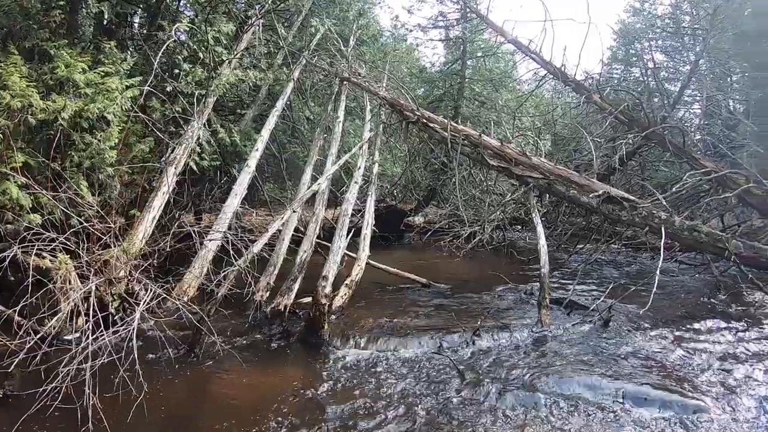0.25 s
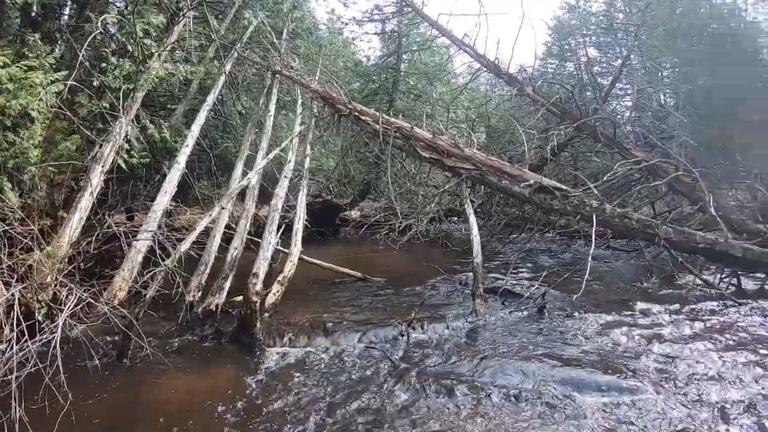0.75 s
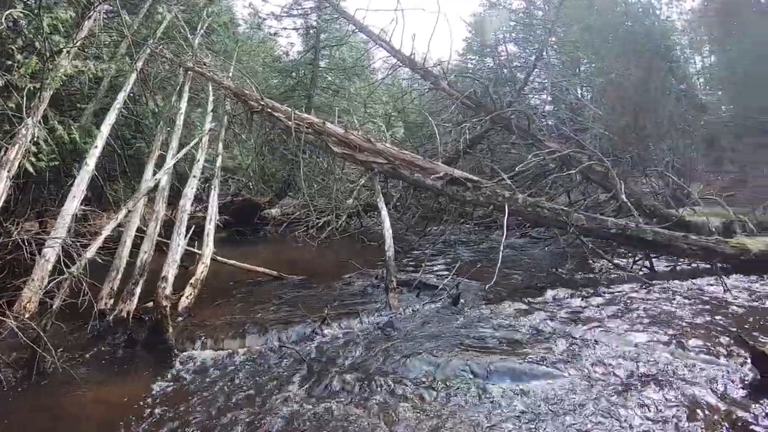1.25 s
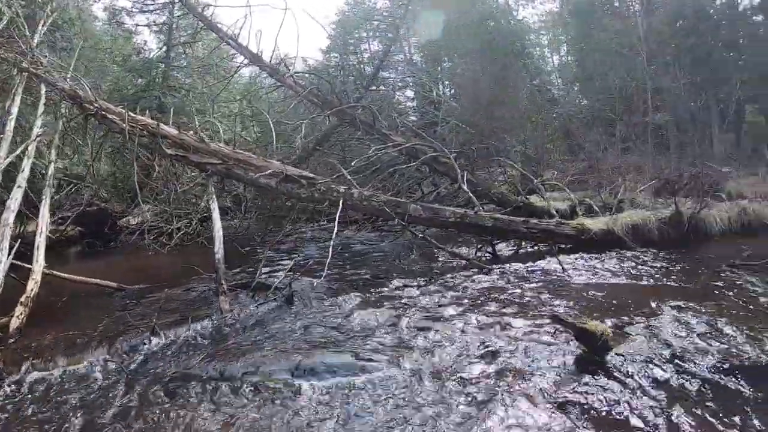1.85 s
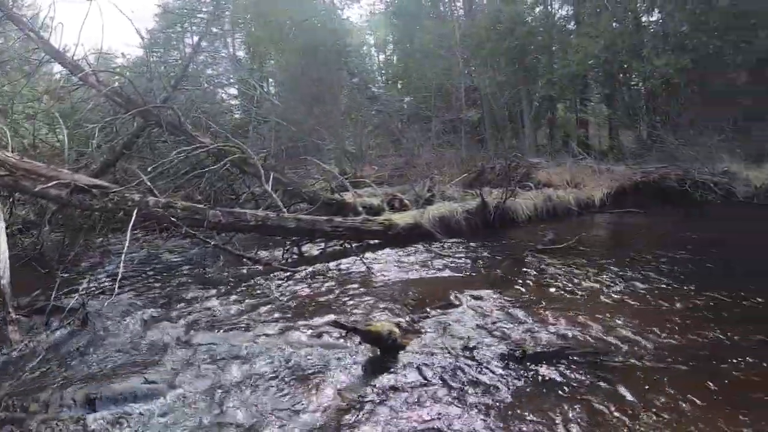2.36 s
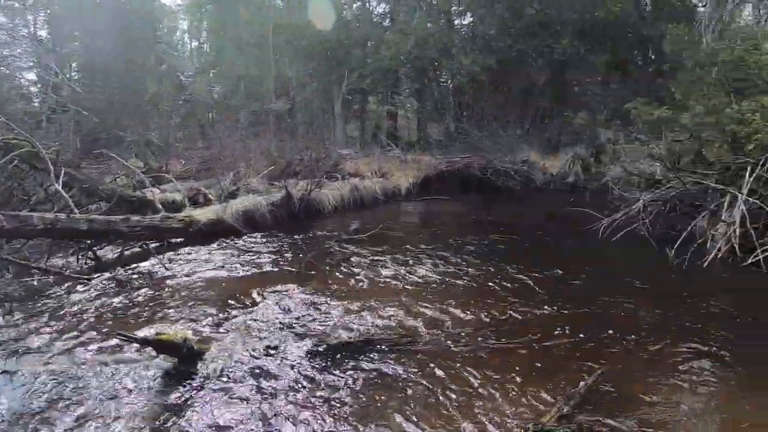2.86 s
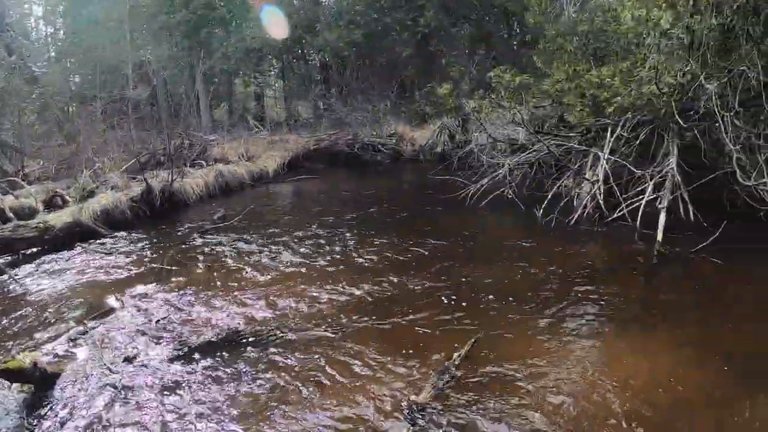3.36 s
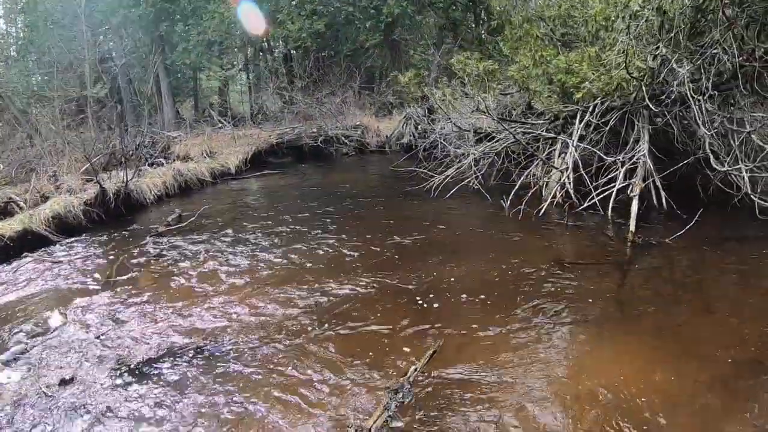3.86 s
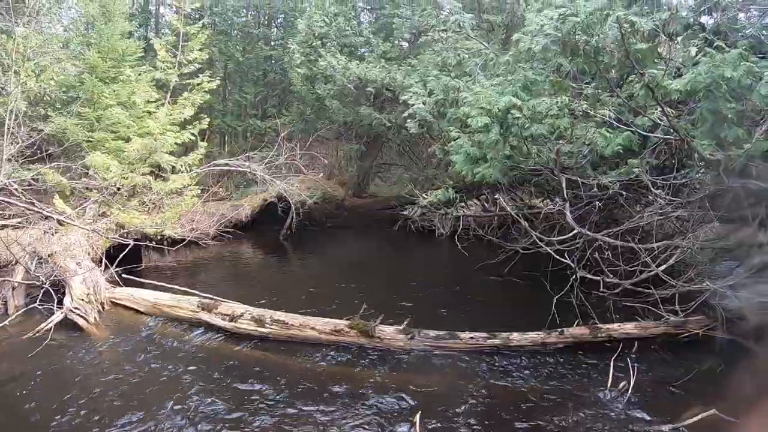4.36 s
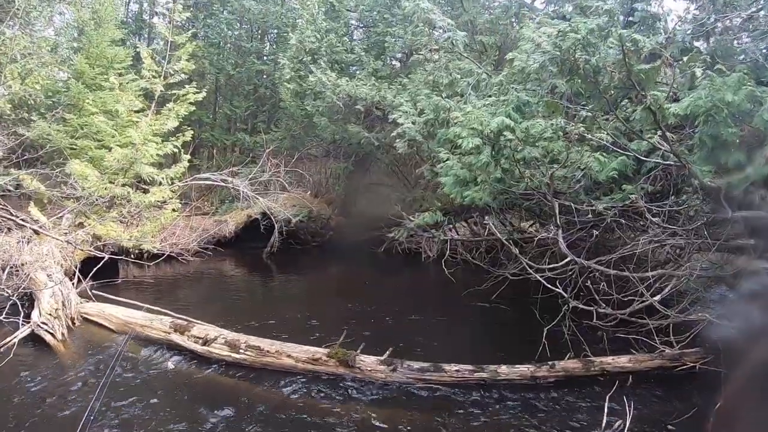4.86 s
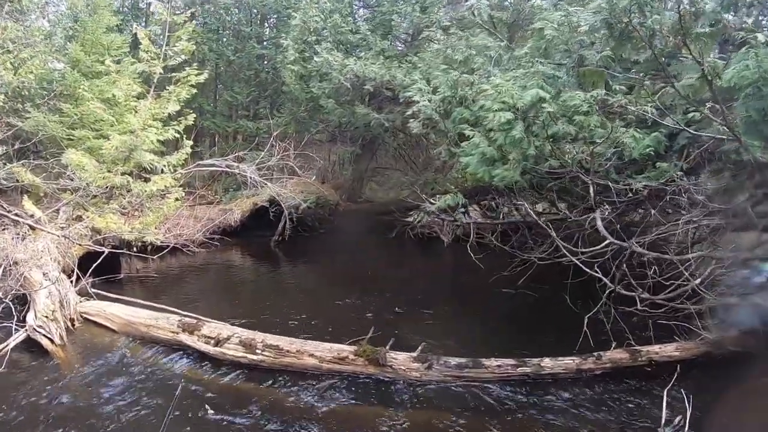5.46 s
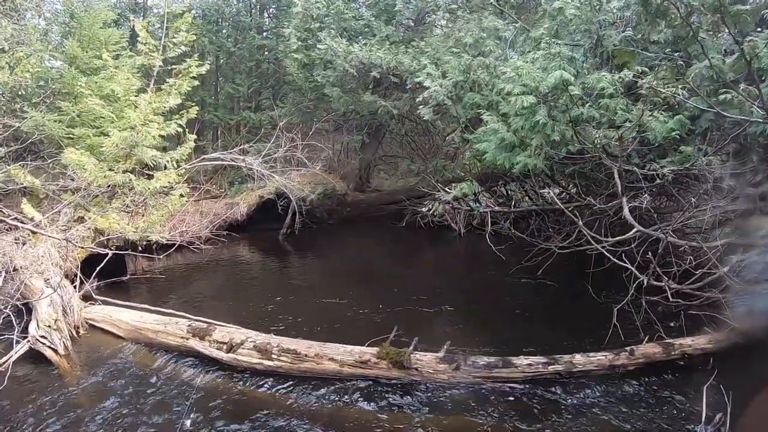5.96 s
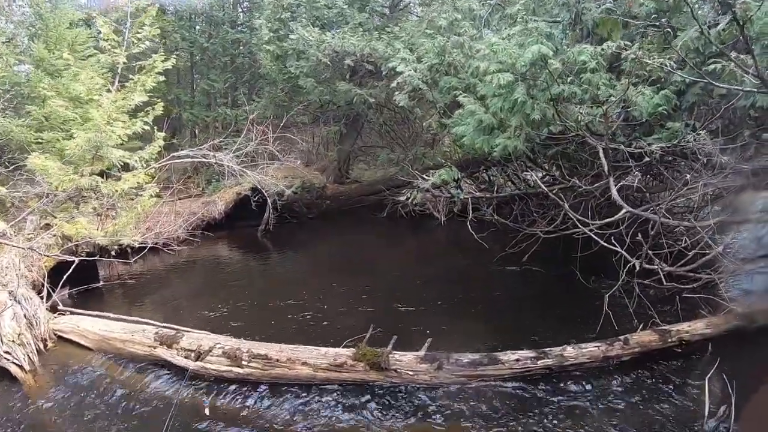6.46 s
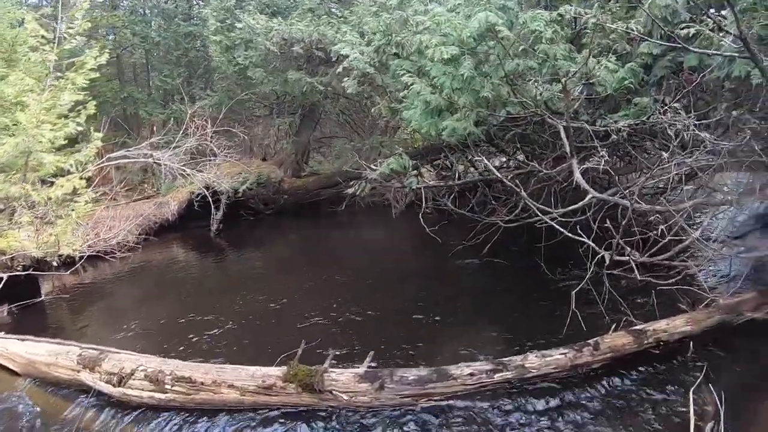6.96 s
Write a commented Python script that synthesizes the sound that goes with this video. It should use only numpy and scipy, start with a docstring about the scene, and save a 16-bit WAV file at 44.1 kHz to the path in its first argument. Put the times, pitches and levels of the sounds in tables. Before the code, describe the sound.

A small creek babbles over a shallow riffle, cuts to near-silence for a moment, then returns fuller and deeper, gulping around a log.

```python
"""A small forest creek in stereo: a shallow riffle, a brief near-silence, then a deeper pool behind a log.
The rush is a swarm of tiny bubble rings over hiss, coloured in time and frequency; larger air pockets
gulp, mostly with rising pitch, and droplets tick or ping. Side water, a separate swarm, widens the image
late in each view. Faint lumpy low noise is the air on the microphone."""
import sys
import numpy as np
from scipy import signal
from scipy.fft import rfft, irfft, next_fast_len
from scipy.io import wavfile
from scipy.ndimage import uniform_filter1d

SR = 44100
rng = np.random.default_rng(int(sys.argv[2]) if len(sys.argv) > 2 else 0)


def persist_wave(psi):
    """Save psi, clipped to +-1, as 16-bit WAV."""
    counts = np.round(np.clip(psi, -1, 1) * 32767).astype(np.int16)
    wavfile.write(sys.argv[1], SR, np.atleast_2d(counts).T)


N = 318137
SECOND_VIEW_S = 4.32  # the flow colour changes here from riffle to pool


def gain_of(db):
    """Amplitude factor of a level in dB."""
    return 10 ** (np.asarray(db) / 20)


def evened(x):
    """Scales a signal to rms 1."""
    return x / np.sqrt(np.mean(x ** 2) + 1e-20)


def read(points, hz):
    """Interpolates a spectrum table on a log-frequency axis."""
    table_hz, value = np.transpose(points)
    return np.interp(np.log(hz + 1), np.log(table_hz + 1), value)


def follow(rows, t):
    """Interpolates every column of a time curve at the times t."""
    time_s, *columns = np.transpose(rows)
    return np.array([np.interp(t, time_s, column) for column in columns])


def unit(db):
    """Shifts a spectrum so that its powers sum to 1."""
    return db - 10 * np.log10(np.sum(gain_of(db) ** 2))


def chance(smooth_s):
    """A slow random wander of rms 1: noise averaged twice."""
    size = max(round(smooth_s * SR), 1)
    smooth = uniform_filter1d(rng.standard_normal(N), size)
    return evened(uniform_filter1d(smooth, size))


def spurts(decay_s):
    """Splashes of uneven size that start at once and die away exponentially; rms 1."""
    per_s = 60
    kicks = rng.exponential(1, N) * (rng.random(N) < per_s / SR)
    out = signal.lfilter([1], [1, -np.exp(-1 / (decay_s * SR))], kicks)
    return evened(out - out.mean())


def patches(t, hz):
    """Random patches a few hundred Hz wide and some 40 ms long; rms 1."""
    noise = rng.standard_normal((len(t), len(hz))).T
    tall = uniform_filter1d(noise, size=12, axis=0)
    return evened(uniform_filter1d(tall, size=7, axis=1))


def bubble(length_s, hz, rise, attack):
    """Trapped air rings a few cycles, swelling faster than it dies; the pitch glides by the factor rise."""
    u = np.linspace(0, 1, max(round(length_s * SR), 4))
    warped = u ** np.clip(attack, .3, .8)  # smaller attack = sharper start
    swell = np.minimum(1.62 * np.sin(np.pi * warped) ** 2, 1)
    return swell * np.sin(2 * np.pi * np.cumsum(hz * rise ** u) / SR)


def placed(rows):
    """Lays out bubbles (time s, length s, start Hz, rise, attack, level dB) in time."""
    out = np.zeros(N)
    for time_s, length_s, hz, rise, attack, db in rows:
        sound = gain_of(db) * bubble(length_s, hz, rise, attack)
        out[round(time_s * SR):][:len(sound)] += sound
    return out


def swarm(per_s_at_1khz, spread_db_at_1khz, clump, hiss_db, count=56):
    """Bubble rings of many sizes in clumps, about equally strong at all pitches, over white hiss."""
    size = next_fast_len(N + SR // 4)
    splashes, lapping = spurts(decay_s=.004), chance(smooth_s=.05)
    total = np.zeros(size // 2 + 1, complex)
    for hz in np.geomspace(140, 15000, count):
        cycles, rise = rng.uniform(11.0, 24.5), rng.uniform(1.0, 1.4)
        # the smallest come in the strongest bursts
        busy = np.exp(clump * (hz / 4000) ** .6 * splashes + .2 * lapping)
        # small bubbles are more numerous
        per_s = per_s_at_1khz * (hz / 1000) ** .8
        # four times too many candidates, thinned to follow busy
        at = rng.integers(0, N, 4 * round(per_s * N / SR))
        keep = rng.random(len(at)) < busy[at] / busy.mean() / 4
        big = np.minimum(rng.exponential(1, len(at)), 3.2)
        spread_db = spread_db_at_1khz * (hz / 1000) ** -.22
        train = np.bincount(at, keep * gain_of(spread_db * big), N)
        grain = bubble(cycles / hz, hz / np.sqrt(rise), rise, attack=0.42)
        train_spectrum = rfft(train - train.mean(), size) / train.std()
        grain_spectrum = rfft(grain / np.linalg.norm(grain), size)
        # sqrt(hz) makes up for the log spacing of the pitches
        total += train_spectrum * grain_spectrum * np.sqrt(hz)
    return evened(irfft(total, size)[:N]) + gain_of(hiss_db) * rng.standard_normal(N)


def coloured(x, field_db):
    """Flattens a sound's spectrum and gives it the level field_db(frames, hz), dB of power per bin."""
    frame, hop = 1024, 256
    hz, t, z = signal.stft(evened(x), SR, nperseg=frame, noverlap=frame - hop)
    power = abs(z) ** 2
    smooth_power = uniform_filter1d(np.mean(power, 1), 9)
    z = z / np.sqrt(smooth_power)[:, None] * np.sqrt(np.mean(power))
    z = z * gain_of(field_db(t, hz)) * np.sqrt(len(hz))
    return signal.istft(z, SR, nperseg=frame, noverlap=frame - hop)[1][:N]


def flow(t):
    """Rush and spray levels in dB through both views."""
    # flow in each view: (time [s], rush level [dB], high spray level [dB])
    view_levels = [
        [(.2, -50, -81), (.45, -47.5, -72.5), (.75, -48.5, -68.5), (1.1, -44.5, -65), (1.5, -45.5, -67),
         (2.0, -44.5, -62.5), (2.8, -45.5, -63), (3.4, -45.5, -65.5), (3.85, -49, -67.5), (4.05, -50, -68),
         (4.22, -46, -60.5)],
        [(4.47, -49.5, -87), (4.58, -43.5, -73.5), (4.7, -44.5, -70.5), (4.85, -39, -65), (5.3, -41.5, -64.5),
         (5.6, -46, -69.5), (5.82, -44, -75), (6.0, -41.5, -66.5), (6.15, -37, -59.5), (6.4, -37.5, -64),
         (6.7, -45.5, -73), (6.9, -42.5, -71.5), (7.2, -49, -74.5)],
    ]
    return follow(np.concatenate(view_levels), t)


def stream_field(t, hz):
    """Each view's water colour, churning in patches, lifted by the rush below and the spray above."""
    # bands that set the levels, rush then spray: (low edge [Hz], high edge [Hz])
    flow_bands = [(400, 1400), (5000, 15000)]
    # relative colour of the water in each view: (frequency [Hz], level per Hz [dB])
    riffle_colour = [(100, -20.5), (140, -6.5), (290, -11.5), (664, -1.5), (1220, -6), (1800, -10.5),
                     (3500, -17), (5500, -28), (6500, -35.5), (10600, -41), (13000, -54), (15500, -59.5)]
    pool_colour = [(100, -13.5), (170, -8.5), (406, -4.5), (825, -8), (1920, -7.5), (3600, -14.5),
                   (4500, -21), (5600, -24.5), (7070, -31.5), (10600, -33), (11600, -45), (13800, -43),
                   (15500, -62)]
    # how far each pitch follows spray rather than rush: (frequency [Hz], share [0 = rush, 1 = spray])
    riffle_share = [(240, 0.29), (750, 0), (2600, 0.21), (8700, 0.9), (14000, 0.9)]
    pool_share = [(240, -0.046), (750, 0.13), (2600, 0.38), (8700, 0.99), (14000, 1.46)]
    patchy_db = 1.2  # rms
    first = t < SECOND_VIEW_S
    colour = np.where(first, read(riffle_colour, hz)[:, None], read(pool_colour, hz)[:, None])
    share = np.where(first, read(riffle_share, hz)[:, None], read(pool_share, hz)[:, None])
    band_power = [np.sum(gain_of(colour[(hz >= low) & (hz < high)]) ** 2, 0) for low, high in flow_bands]
    rush, spray = flow(t) - 10 * np.log10(band_power)
    return patchy_db * patches(t, hz) + colour + rush + share * (spray - rush)


def stream():
    """The rush of the creek: a dense bubble swarm with the colour and level of the flow."""
    return coloured(swarm(per_s_at_1khz=60, spread_db_at_1khz=3.7, clump=.28, hiss_db=-1.5), stream_field)


def gulps():
    """Air pockets that stand out of the rush; those with more rise swell more slowly; strength wobbles."""
    # air pockets: (time [s], length [ms], start pitch [Hz], pitch rise [factor], level [dB])
    pockets = [(0.225, 9.8, 1090, 1.4, -44), (0.44, 16, 540, 1.4, -48), (0.476, 16, 546, 1.1, -42.5),
               (0.508, 9.1, 1185, 0.96, -38), (0.5653, 10, 1520, 1.3, -37.5), (0.752, 20, 640, 1.03, -42),
               (0.8093, 46, 438, 1.01, -40), (0.9159, 36, 382, 1.83, -37.5), (1.0246, 7, 695, 0.83, -31),
               (1.038, 23, 580, 1.3, -37.5), (1.044, 20, 1150, 1.3, -43), (1.0676, 51, 390, 1, -45),
               (1.214, 26, 780, 1.1, -46), (1.245, 24, 640, 0.8, -42), (1.306, 26, 620, 1.3, -37.5),
               (1.336, 39, 738, 1.48, -35.5), (1.38, 30, 1153, 1.07, -43), (1.4379, 62, 494, 1.4, -40.5),
               (1.516, 35, 298, 1.6, -41), (1.609, 18, 570, 0.97, -41.5), (1.907, 16, 650, 1.02, -40),
               (1.949, 15, 670, 1.17, -37), (1.965, 22, 1264, 1.07, -36), (1.969, 7.2, 860, 1.2, -33),
               (2.045, 27, 668, 1.2, -36.5), (2.293, 5, 1442, 1.06, -32), (2.3608, 16.5, 368, 1.5, -38),
               (2.3796, 15, 462, 3, -37.5), (2.4488, 6.5, 1800, 1.4, -36), (2.5703, 6.5, 1520, 0.85, -37),
               (2.578, 13, 1070, 1.16, -39.5), (2.61, 15, 1340, 0.93, -43), (2.672, 22, 553, 1.1, -45),
               (2.985, 7.2, 840, 1.14, -31.5), (3.063, 33, 400, 1.2, -43.5), (3.072, 13, 920, 1.1, -39.5),
               (3.098, 18, 400, 1, -37.5), (3.1486, 25, 514, 1.4, -35.5), (3.176, 26, 460, 0.95, -41.5),
               (3.185, 15, 915, 1, -41), (3.385, 33, 323, 1.9, -37), (3.41, 100, 303, 1.29, -44),
               (3.418, 30, 470, 1.6, -33.5), (3.458, 10.3, 950, 1.4, -38), (3.477, 36, 690, 0.84, -34.5),
               (3.676, 49, 344, .97, -44), (3.715, 60, 254, 2.4, -45.5), (3.909, 17, 648, 1.02, -33.5),
               (4.2211, 24, 430, 1, -43.5), (4.5459, 26.5, 333, 1.78, -32), (4.595, 6, 1210, 1.44, -34.5),
               (4.758, 62, 206, 1.35, -29), (4.7697, 11.85, 1780, 1.03, -33), (4.7873, 26, 543, 0.98, -35),
               (4.789, 35, 240, 1.92, -31), (4.814, 70, 146, 2.97, -25), (4.836, 18, 613, 1.1, -34),
               (4.913, 65, 180, 1.94, -35.5), (4.971, 16, 390, 1.1, -26), (4.985, 15, 390, 1.1, -32.5),
               (5.005, 16, 440, 1.26, -37), (5.146, 36, 563, 1.4, -32), (5.25, 12, 1840, 0.95, -34),
               (5.256, 22, 705, 2.3, -34), (5.2664, 14, 345, 1.8, -30), (5.341, 14, 1030, 1.1, -39),
               (5.398, 21, 338, 1.34, -34), (5.4151, 64, 376, 1.21, -37.5), (5.7651, 17, 400, 1.74, -36),
               (5.911, 6, 950, 1.18, -29), (5.935, 11, 545, 1.07, -34), (5.9906, 8.7, 547, 2.3, -30.5),
               (6.03, 22, 398, 1.27, -34.5), (6.1, 20, 360, 0.95, -33), (6.104, 9.9, 1560, 0.89, -32),
               (6.16, 11, 1890, 1, -32), (6.169, 16, 930, 1.07, -32.5), (6.214, 26, 225, 1.05, -33),
               (6.2535, 47, 200.7, 0.96, -30.5), (6.256, 22, 370, 0.9, -27.5), (6.278, 24, 398, 1.06, -29),
               (6.3018, 22, 418, 0.99, -27.5), (6.3573, 13.6, 710, 0.9, -23), (6.351, 12, 1290, 1.1, -35),
               (6.382, 16, 854, 1.08, -31.5), (6.435, 18, 377, 1.25, -31), (6.46, 15, 1980, 1.1, -38),
               (6.53, 13, 465, 1.26, -35), (6.7177, 41, 254, 2.2, -38), (6.7692, 12.8, 302, 1.72, -31),
               (6.898, 15, 355, 1.1, -37)]
    ring_attack, gulp_attack, gulp_rise = 0.38, 0.66, 1.5  # steady ring; climbing gulp; factor of full gulp
    ragged_db = 0.9  # rms
    wobble = gain_of(ragged_db * chance(smooth_s=.006))
    rows = []
    for time_s, length_ms, hz, rise, db in pockets:
        attack = np.interp(rise, [1, gulp_rise], [ring_attack, gulp_attack])
        rows.append((time_s, length_ms / 1000, hz, rise, attack, db))
    return wobble * placed(rows)


def droplets():
    """Droplets that tick or ping: short rings of a few cycles with a slight rise in pitch."""
    # droplets: (time [s], start pitch [Hz], length [cycles], level [dB])
    drops = [(0.5237, 3500, 10, -44), (0.9702, 3300, 6.5, -39.5), (1.659, 2220, 6, -37),
             (2.155, 3400, 6.1, -28), (2.192, 2135, 8.8, -34), (2.288, 7050, 8.7, -32.5),
             (2.8089, 4150, 7, -39), (3.0375, 9600, 9, -46), (3.1188, 5200, 8.8, -43),
             (3.362, 7000, 12, -46), (3.363, 1800, 24, -41), (3.3966, 9000, 12, -47), (3.41, 3290, 16, -37),
             (3.419, 6400, 10, -36), (3.501, 7000, 6.5, -41), (3.63, 4300, 16, -39.5),
             (3.648, 3650, 12, -34.5), (3.651, 6900, 9.2, -32.5), (3.7056, 6700, 5, -42),
             (3.78, 5100, 14, -45), (3.9, 1680, 21, -43.5), (4.1725, 6750, 15, -41), (4.235, 6700, 12, -39),
             (4.5303, 4220, 18, -44.5), (4.571, 3570, 8, -38.5), (5.2599, 3070, 6.5, -31),
             (5.3299, 8500, 9, -48), (5.51, 3180, 17, -40.5), (5.5846, 4700, 8.5, -37.5),
             (6.061, 3090, 30, -36.5), (6.147, 4330, 9, -48), (6.185, 2620, 7.7, -34),
             (6.234, 3600, 12, -36), (6.305, 4800, 5, -34), (6.459, 3400, 16, -40.5),
             (6.7817, 2430, 18, -38.5), (7.004, 3730, 10, -43), (7.084, 3020, 12, -38.5),
             (7.135, 7000, 7.3, -43.5), (7.1385, 2900, 6.7, -31)]
    rise, attack = 1.035, 0.49
    return placed([(time_s, cycles / hz, hz, rise, attack, db) for time_s, hz, cycles, db in drops])


def opened(t):
    """How far the stereo image has opened, 0-1, once in each view."""
    riffle_opens_s, pool_opens_s, opening_s = 2.925, 6.82, 0.42
    start_s = np.where(t < SECOND_VIEW_S, riffle_opens_s, pool_opens_s)
    return np.clip((t - start_s) / opening_s, 0, 1)


def side_field(t, hz):
    """Side water that opens late in each view plus a faint treble, present throughout; both follow the spray."""
    # relative colour of the side water: (frequency [Hz], level per Hz [dB])
    wide_colour = [(82, -55), (140, -22), (406, -20), (638, -6), (1780, -1.5), (2800, -7), (3150, -11.5),
                   (5000, -20), (5700, -12.5), (6790, -10), (8200, -18), (15500, -48)]
    # relative colour of the faint treble: (frequency [Hz], level per Hz [dB])
    treble_colour = [(4000, -31), (10500, -19), (12000, -11.5), (15700, -24)]
    wide_db, treble_db = 15, -22  # relative to the spray
    wide = gain_of(unit(read(wide_colour, hz))[:, None] + wide_db) * opened(t)
    treble = gain_of(unit(read(treble_colour, hz))[:, None] + treble_db)
    return 10 * np.log10(wide ** 2 + treble ** 2) + flow(t)[1]


def side_water():
    """Water that differs between the channels: a second, sparser and more clumped bubble swarm."""
    return coloured(swarm(per_s_at_1khz=42, spread_db_at_1khz=5.0, clump=0.37, hiss_db=-7.5), side_field)


def right_only(aside):
    """The part of the side water to take from the mid so that it lands on the right alone."""
    # lean of the side water to the right: (frequency [Hz], share [0-1])
    right_lean = [(2500, 0), (5000, 0.6), (6800, 0.68), (14000, 0.45)]
    return irfft(rfft(aside) * read(right_lean, np.fft.rfftfreq(N, 1 / SR)), N)


def rumble():
    """Lumpy low noise of air on the microphone as mid and a much weaker, independent side."""
    # relative colour of the rumble: (frequency [Hz], level [dB])
    rumble_colour = [(12, -20), (20, 0), (45, 0), (85, -2), (115, -10), (170, -30), (260, -120)]
    # strength of the moving air: (time [s], level [dB])
    gusts = [(0, -66), (1.7, -68), (2.2, -63), (3.2, -74), (4.3, -76), (4.5, -62), (5.5, -64), (7.2, -65)]
    lumps = rng.standard_normal((2, N)) * gain_of(4 * chance(smooth_s=0.042))
    shaped = irfft(rfft(lumps) * gain_of(read(rumble_colour, np.fft.rfftfreq(N, 1 / SR))), N)
    mid_side_db = [[0], [-25]]
    return evened(shaped) * gain_of(follow(gusts, np.arange(N) / SR) + mid_side_db)


def scene():
    """Mixes the water as mid and side, high-passes it, adds the rumble and forms left and right."""
    water_low_hz = 132.6
    drop_right = 0.45  # lean of the droplets to the right once the image is open, 0-1
    rush = stream()
    aside = side_water()
    leaning = right_only(aside)
    drops = droplets()
    aside = aside - drop_right * opened(np.arange(N) / SR) * drops
    water = np.array([rush + gulps() + drops - leaning, aside])
    high_pass = signal.butter(10, water_low_hz, "high", fs=SR, output="sos")
    mid, side = signal.sosfilt(high_pass, water) + rumble()
    return np.array([mid + side, mid - side])


def record(dry):
    """Fades each view in, cuts it off to a faint floor, then low-passes everything."""
    # the two views: (start [s], fade-in [s], end [s])
    views = [(0.072, 0.076, 4.2535), (4.391, 0.072, 7.3)]
    fade_power, cut_db_per_s, floor_db, edge_hz = 2.25, -5000, -60, 15700
    t = np.arange(N) / SR
    fader = gain_of(floor_db)
    for start_s, fade_s, end_s in views:
        fade_in = np.clip((t - start_s) / fade_s, 0, 1) ** fade_power
        cut = gain_of(cut_db_per_s * np.maximum(t - end_s, 0))
        fader = fader + fade_in * cut
    low_pass = signal.firwin(511, edge_hz, window=("kaiser", 9), fs=SR)
    return signal.oaconvolve(dry * fader, low_pass[None], "same")


dry = scene()
out = record(dry)
persist_wave(out)
```